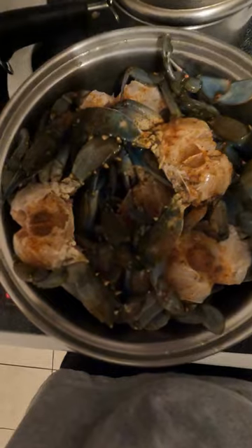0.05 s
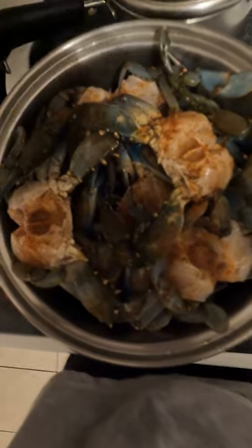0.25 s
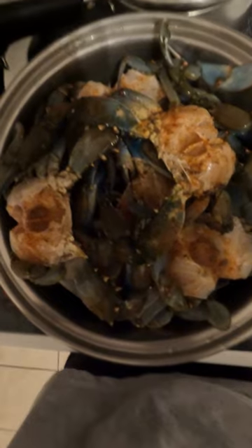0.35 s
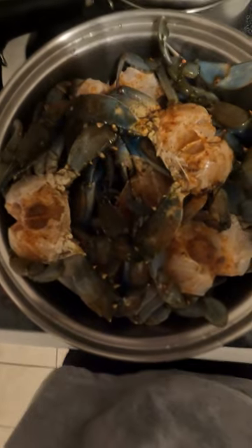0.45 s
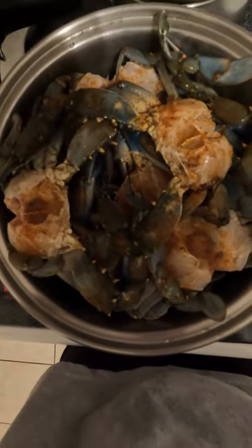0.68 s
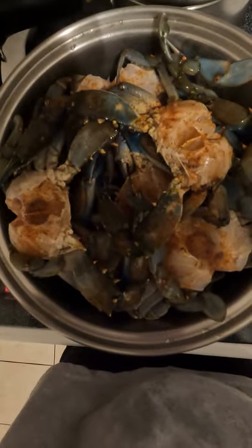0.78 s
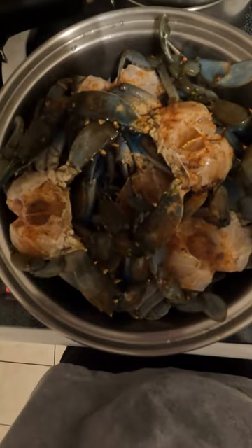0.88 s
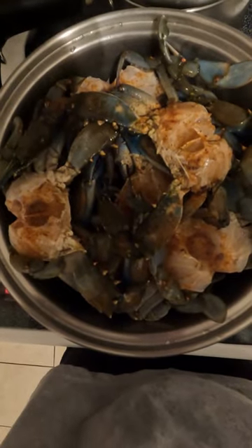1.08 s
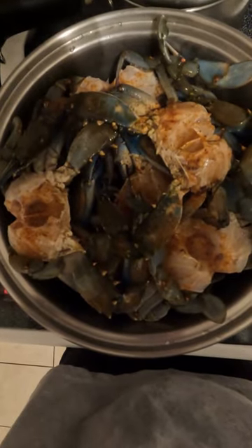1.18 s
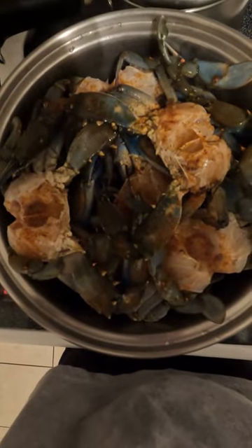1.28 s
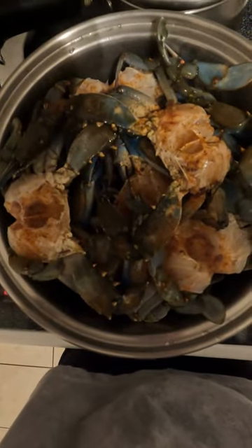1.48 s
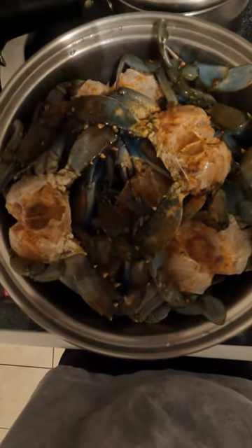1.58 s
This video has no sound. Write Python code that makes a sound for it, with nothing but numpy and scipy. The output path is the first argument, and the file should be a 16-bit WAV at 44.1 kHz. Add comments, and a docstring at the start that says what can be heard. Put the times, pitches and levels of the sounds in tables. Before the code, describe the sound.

Crab shells and legs tick faintly in a steel pot, heard from just above. A cluster of tiny wet snaps and a light scrape comes around 0.2 to 0.3 seconds, with hand rumble and one soft, low microphone thump. Irregular clicks follow about every 0.1 to 0.2 seconds until 1.6, some with a small knock on the pot's wall. Appliance hum, kitchen air and soft hiss run underneath.

```python
"""Live crabs shift in a steel pot in a quiet kitchen, heard from just above by a hand-held microphone.
Shells and legs tick against each other in tiny wet snaps that echo between the pot's walls.
Some knock on the wall, and a leg scrapes lightly over shell. Behind them sit an appliance hum,
room air and a soft hiss. The hand rumbles and nudges the microphone, once with a soft thump."""
import sys
import numpy as np
from scipy import signal
from scipy.fft import rfft, irfft
from scipy.io import wavfile

SR = 44100
rng = np.random.default_rng(int(sys.argv[2]) if len(sys.argv) > 2 else 0)


def wrap_up_sound(samples):
    """Save the sound to the file named by the first command line argument, as 16-bit audio."""
    columns = np.atleast_2d(samples).T
    # keep every value between -1 and 1, then stretch to whole-number steps
    tamed = np.clip(columns, -1, 1)
    steps = np.round(tamed * 32767).astype(np.int16)
    wavfile.write(sys.argv[1], SR, steps)


N = 72765
TIME = np.arange(N) / SR


def from_db(db):
    """Decibels to gain."""
    return 10 ** (np.asarray(db) / 20)


def rms_one(x):
    """Scale to unit rms."""
    return x / np.sqrt(np.mean(x ** 2) + 1e-20)


def unit_energy(x):
    """Scale to unit energy."""
    return x / np.sqrt(np.sum(x ** 2) + 1e-20)


def envelope(points):
    """Gain over time from (time [s], level [dB]) points."""
    return from_db(np.interp(TIME, *np.transpose(points)))


def eq_curve(points, size):
    """Gain of each frequency bin from (frequency [Hz], level [dB]) points."""
    hz, db = np.transpose(points)
    return from_db(np.interp(np.log(np.fft.rfftfreq(size, 1 / SR) + 1), np.log(hz), db))


def noise(spectrum):
    """Steady coloured noise at unit rms."""
    return rms_one(irfft(rfft(rng.standard_normal(N)) * eq_curve(spectrum, N), N))


def crack(spectrum, size=512):
    """A minimum-phase click: a hard attack with the given spectrum."""
    cepstrum = irfft(np.log(eq_curve(spectrum, size)))
    cepstrum[1:size // 2] *= 2
    cepstrum[size // 2 + 1:] = 0
    return unit_energy(irfft(np.exp(rfft(cepstrum))))


def ring(hz, t60, size=2048):
    """A dying sine of unit energy."""
    t = TIME[:size]
    return unit_energy(np.sin(2 * np.pi * hz * t) * from_db(-60 * t / t60))


def struck(start_s, modes):
    """Modes set ringing at one moment, in alternating polarity."""
    t = np.maximum(TIME - start_s, 0)
    return sum((-1) ** k * from_db(db - 60 * t / t60) * np.sin(2 * np.pi * hz * t)
               for k, (hz, db, t60) in enumerate(modes))


def echoes(x, predelay_s, t60):
    """Dense, slightly dull reflections that start after a delay and die away."""
    # tone of the walls' reflections: (frequency [Hz], level [dB])
    wall_colour = [(1000, 2), (7500, -1), (10000, -2), (15000, -6)]
    tail = rng.standard_normal(N) * (TIME > predelay_s) * from_db(-60 * TIME / t60)
    tail = irfft(rfft(unit_energy(tail)) * eq_curve(wall_colour, N), N)
    return signal.fftconvolve(x, tail)[:N]


def hiss(level_db=-78, split_hz=10900):
    """Soft hiss whose highest treble opens up gradually."""
    # tone of the hiss: (frequency [Hz], level [dB])
    hiss_colour = [(800, -13), (2600, 0.5), (4300, -2.5), (7200, -6.5), (8600, -21), (12500, -13),
                   (15000, -27)]
    # fade-in of the band above the split: (time [s], level [dB])
    top_fade = [(0, -21), (.45, -9), (.7, -7), (.95, -3), (1.3, -2), (1.65, 0)]
    whole = noise(hiss_colour)
    top = irfft(rfft(whole) * (np.fft.rfftfreq(N, 1 / SR) > split_hz), N)
    return from_db(level_db) * (whole - top + envelope(top_fade) * top)


def room_air():
    """The room's air: a steady, dark bed of noise."""
    # tone of the air: (frequency [Hz], level [dB])
    air_colour = [(20, 3), (70, -4.5), (125, -11.5), (165, 5.5), (230, -7), (300, -4), (400, -6.5),
                  (520, -13.5), (620, -16.5), (880, -30), (1100, -26), (1450, -27.5), (1900, -35),
                  (2800, -35.5), (4300, -49.5), (9000, -56.5), (15000, -105)]
    return from_db(-49.5) * noise(air_colour)


def appliance_hum(waver_hz=11.2):
    """Motor tones, some steady, most wavering in strength and phase."""
    # motor tones: (frequency [Hz], level [dB], waver depth [0-1])
    motor_tones = [(87.56, -60, 0.59), (118.4, -63.5, 0.61), (147.6, -68, 1), (174.6, -62, 0.86),
                   (261.6, -56.5, 0.48), (293.9, -56.5, 0.47), (310.3, -57, 0), (356.8, -61, 0.44),
                   (409, -65.5, 0.81), (476.3, -64.5, 0.94), (512.8, -64.5, 0), (563.6, -72.5, 0.28),
                   (783, -84, 0.3), (1015, -87, 0), (1071, -83, 0.6), (2495, -91.5, 0.1), (2522, -86, 0),
                   (2603, -95, 1)]
    slow = np.exp(-(np.fft.fftfreq(N, 1 / SR) / waver_hz) ** 2)
    out = 0
    for hz, db, depth in motor_tones:
        jitter = rng.standard_normal(N) + 1j * rng.standard_normal(N)
        wander = np.fft.ifft(np.fft.fft(jitter) * slow)
        wander /= np.std(wander)
        tone = (1 - depth + depth * wander) * np.exp(2j * np.pi * (hz * TIME + rng.random()))
        out = out + from_db(db) * rms_one(tone.real)
    return out


def handling(push_width_s=0.007):
    """Low rumble of the hand and soft pushes on the microphone's case, which rings on low."""
    # swells of the hand's rumble: (time [s], level [dB])
    swells = [(0, -55), (.045, -39), (.1, -52.5), (.15, -36.5), (.23, -39), (.31, -35.5), (.36, -47),
              (.4, -41.5), (.46, -49), (.56, -46.5), (.74, -43.5), (.82, -53), (1.3, -57), (1.53, -47),
              (1.65, -64)]
    # tone of the rumble: (frequency [Hz], level [dB])
    rumble_colour = [(10, 4.5), (28, 2.5), (45, -4), (80, -10.5), (160, -18), (400, -45), (700, -34.5),
                     (1100, -50), (3000, -110)]
    # pushes on the case: (time [s], level [dB])
    pushes = [(0.039, -38.5), (0.169, -38), (0.203, -34.5), (0.2732, -15.5), (0.338, -37), (0.734, -40.5)]
    # ring of the case: (frequency [Hz], level [dB], t60 [s])
    case_modes = [(33.8, -12, 0.19), (82.4, -23.5, 0.35), (114, -23, 0.36), (254.6, -33, 0.17)]
    out = envelope(swells) * noise(rumble_colour)
    for push_s, db in pushes:
        offset = (TIME - push_s) / push_width_s
        thump = (1 - offset ** 2) * np.exp(-offset ** 2 / 2)
        out = out + from_db(db) * (thump + struck(push_s, case_modes))
    return out


def leg_scrape(grains_per_s=400):
    """Dense tiny catches of a leg sliding on shell."""
    # shape of the stroke: (time [s], level [dB])
    stroke = [(0, -91), (.04, -77), (.09, -74), (.14, -79), (.18, -75), (.24, -77), (.26, -70),
              (.285, -74.5), (.33, -72), (.42, -100), (.5, -120)]
    # tone of each catch: (frequency [Hz], level [dB])
    grain_colour = [(500, -4), (2000, 4), (2800, 4), (4300, -5), (6500, -11), (7800, -11), (8700, -11),
                    (9700, -13.5), (10800, -36), (13000, -36.5)]
    grains = (rng.random(N) < grains_per_s / SR) * rng.standard_normal(N)
    return envelope(stroke) * rms_one(signal.fftconvolve(grains, crack(grain_colour))[:N])


def wall_knocks():
    """Shells hit the pot's wall, which rings briefly, damped by the crabs that lie against it."""
    # hits on the wall: (time [s], level [dB])
    knocks = [(.3012, -58.5), (.519, -64.5), (.741, -62), (0.935, -72), (1.119, -73), (1.3288, -65),
              (1.389, -71)]
    # ring of the steel pot: (frequency [Hz], level [dB], t60 [s])
    pot_modes = [(660, -1, 0.098), (770, 2.5, 0.037), (1065, -11, 0.022), (1340, -4.5, 0.06),
                 (1590, -5, 0.022), (2036, 0, 0.013), (2520, -8.5, 0.018), (3820, -10, 0.023)]
    return sum(from_db(db) * struck(hit_s, pot_modes) for hit_s, db in knocks)


def crumble(per_s, decay_s, size, attack_s=0.0015):
    """A run of tiny snaps that swells and dies, at unit energy."""
    t = TIME[:size]
    snaps = (rng.random(size) < per_s / SR) * rng.standard_normal(size)
    return unit_energy(snaps * (1 - np.exp(-t / attack_s)) * np.exp(-t / decay_s))


def shell_snap(size=2048, detune=0.013):
    """One snap of shell: a broad crack and a few short resonances that shift with the shell's size."""
    # tone of the crack: (frequency [Hz], level [dB])
    crack_colour = [(500, -21), (1200, -3), (2200, -9), (3700, -0.5), (5000, -1), (7500, -5.5), (8700, -16),
                    (12500, -21.5), (15500, -32.5)]
    # shell resonances: (frequency [Hz], level [dB], t60 [s])
    shell_modes = [(3850, -12.5, 0.015), (6420, -9.5, 0.02), (7670, -18, 0.0092), (9900, -13.5, 0.0094),
                   (12800, -23, 0.008)]
    attack = crack(crack_colour)
    tuning = 1 + detune * rng.uniform(-1.2, 1)
    body = sum((-1) ** k * from_db(db) * ring(hz * tuning, t60, size)
               for k, (hz, db, t60) in enumerate(shell_modes))
    return np.pad(attack, (0, size - len(attack))) + body


def shell_ticks(size=4096, treble_hz=6430, wet_db=-14, muffle_db_per_octave=-91, makeup_db=13):
    """Shells and legs touch: a first snap, a crumble of smaller ones and a wet crackle after it."""
    # contacts: (time [s], level [dB], crumble decay [s], ring pitch [Hz], ring level [dB],
    # treble shelf [dB], muffled above [Hz])
    contacts = [(0.199, -58, 0.011, 6500, 3, -12, 9100), (0.208, -57.5, 0.0024, 3900, -7, 12, 12000),
                (0.212, -58.5, 0.0036, 6120, 24, -5, 10400), (0.252, -63.5, .0035, 9740, -3.5, 4, 10000),
                (.2605, -64, 0.0023, 7660, -5, -13, 9900), (.270, -72, .003, 6600, 10, 3, 9900),
                (0.2772, -60.5, .004, 9540, -5, -10, 10900),
                (0.3009, -50.5, 0.00088, 3900, -5.5, -22, 11000),
                (0.3040, -59.5, 0.0028, 6400, 3.5, 10, 12000), (0.5169, -56.5, 0.008, 5490, -11, -8, 11600),
                (0.525, -63, 0.009, 6260, -12, -12, 12000), (0.6277, -61, 0.006, 6300, -1, 4, 12500),
                (0.733, -62, 0.0035, 3800, -2, 3, 12000), (0.7395, -55, 0.0025, 3880, -8, -12, 12900),
                (0.749, -67, .004, 7640, -9, -1, 12600), (0.9180, -57, 0.0029, 6300, -2, 3, 14200),
                (0.9292, -65, 0.0049, 7400, -4, 11, 15000), (.9347, -57, 0.00084, 3740, 2, 3, 15000),
                (.939, -68, .007, 7000, -8, 5, 15000), (1.109, -61, 0.008, 7200, -5, 7, 15000),
                (1.1185, -59.5, 0.0018, 6280, 18, 2, 15000), (1.1677, -61.5, 0.0032, 6420, -3, -1, 14500),
                (1.325, -60, 0.0025, 3840, -11, -4, 14000), (1.3281, -53.5, 0.0013, 3760, -4, 18, 15600),
                (1.3876, -53, 0.0025, 5270, -9, 2, 15000), (1.3893, -56.5, 0.0035, 6150, -11, -5, 15100),
                (1.504, -58.5, 0.015, 5440, -14, 2, 13900), (1.598, -61, 0.0041, 5400, -9, -1, 14000)]
    # tone of wet shell crackling: (frequency [Hz], level [dB])
    wet_colour = [(2000, -17), (4500, -7), (7000, 5), (8700, -6), (10300, 5), (12300, -3), (15000, -5)]
    out = np.zeros(N + SR)
    for start_s, db, crumble_s, ring_hz, ring_db, treble_db, top_hz in contacts:
        snaps = crumble(per_s=5500, decay_s=crumble_s, size=size)
        snaps[0] += 0.2  # the first snap
        shelf = crack([(treble_hz, 0), (2 * treble_hz, treble_db)])
        snap = signal.fftconvolve(shell_snap(), shelf)
        crunch = unit_energy(signal.fftconvolve(snaps, snap)[:size])
        ping = unit_energy(signal.fftconvolve(snaps, ring(ring_hz, t60=0.009))[:size])
        crackle = crumble(per_s=3300, decay_s=0.018, size=size)
        wet = unit_energy(signal.fftconvolve(crackle, crack(wet_colour))[:size])
        tick = unit_energy(crunch + from_db(ring_db - 1) * ping + from_db(wet_db) * wet)
        muffle = crack([(top_hz, 0), (2 * top_hz, muffle_db_per_octave)])
        tick = signal.fftconvolve(tick, muffle)
        start = int(start_s * SR)
        out[start:start + len(tick)] += from_db(db + makeup_db) * tick
    return out[:N]


def scene():
    """Crabs in the pot, the kitchen around them, the hand on the microphone."""
    # fader ride on the hum and air: (time [s], level [dB])
    bed_ride = [(0, -18.5), (.022, -15), (.048, -3), (.15, 1.5), (.3, 2.5), (.42, 1.5), (.75, 0), (1.1, -2),
                (1.4, 0), (1.65, -0.5)]
    crabs = shell_ticks() + wall_knocks() + leg_scrape()
    pot = crabs + from_db(-1.5) * echoes(crabs, predelay_s=0.0032, t60=0.085)
    kitchen = from_db(-12) * echoes(pot, predelay_s=0.021, t60=0.4)
    bed = envelope(bed_ride) * (appliance_hum() + room_air())
    return (pot + kitchen + bed + hiss() + handling())[None]


def record(dry):
    """A steep low-pass trims the highest treble."""
    cutoff_hz = 15500
    return signal.sosfilt(signal.ellip(10, .1, 80, cutoff_hz, fs=SR, output="sos"), dry)


dry = scene()
out = record(dry)
wrap_up_sound(out)
```